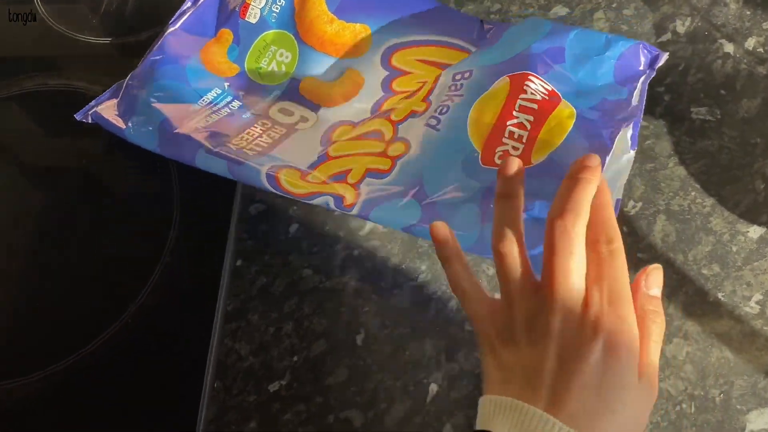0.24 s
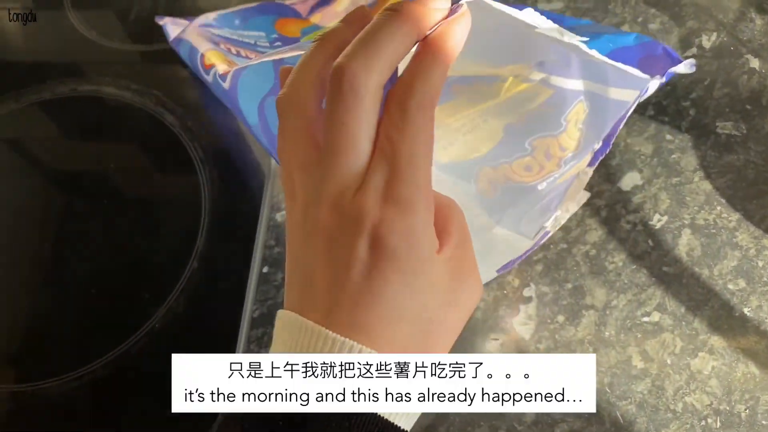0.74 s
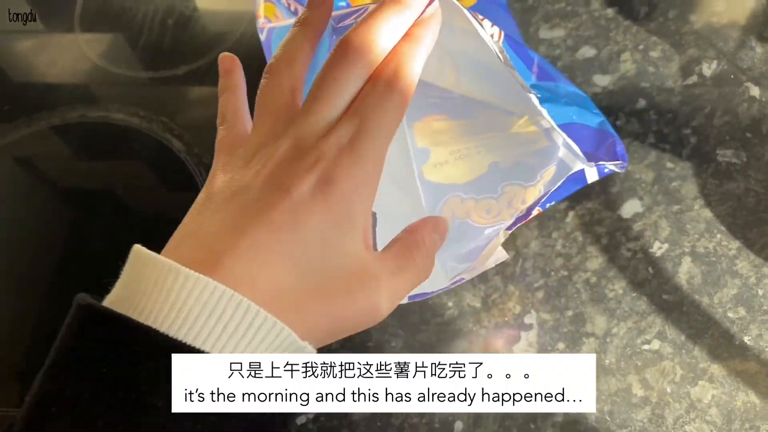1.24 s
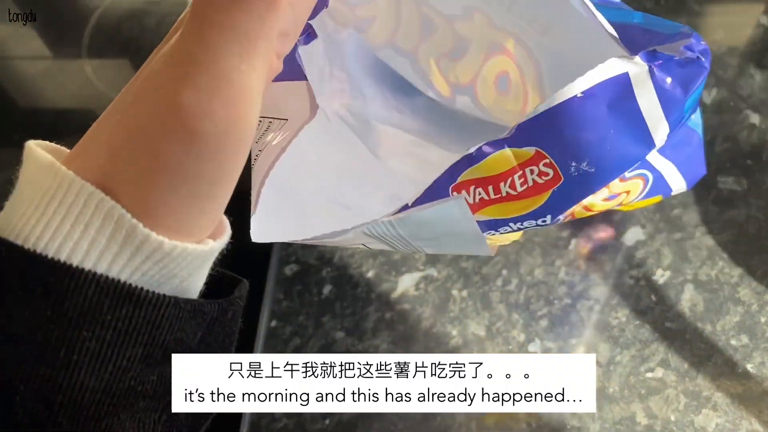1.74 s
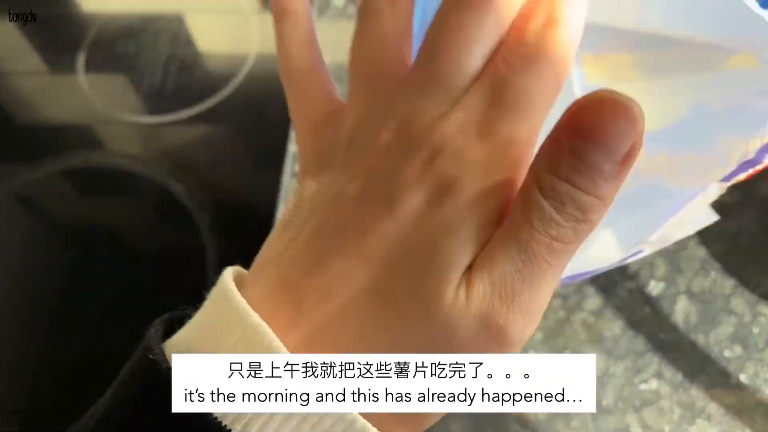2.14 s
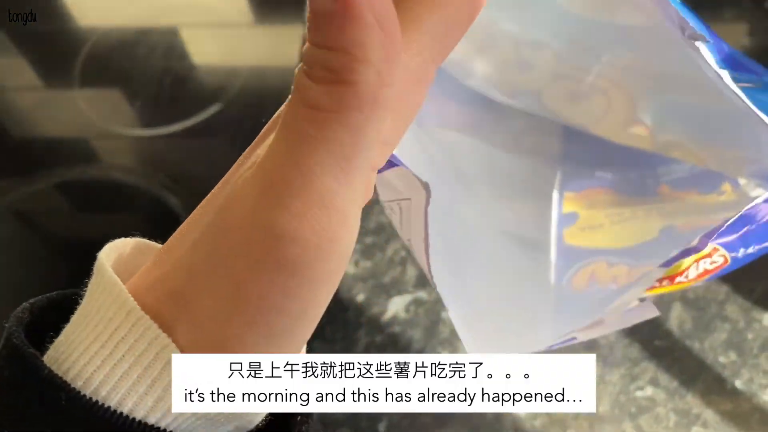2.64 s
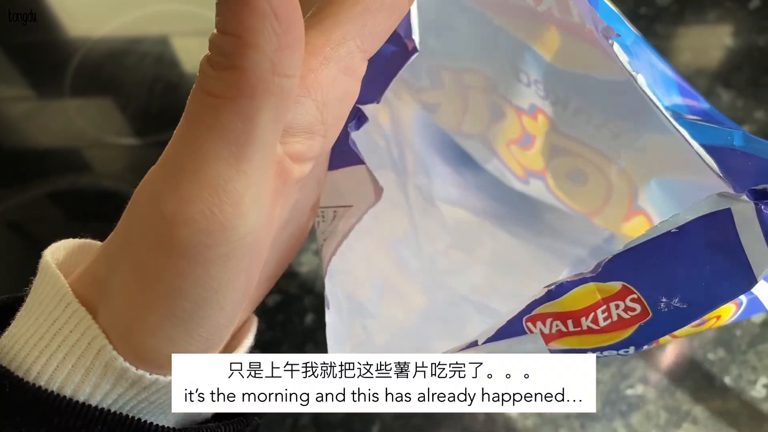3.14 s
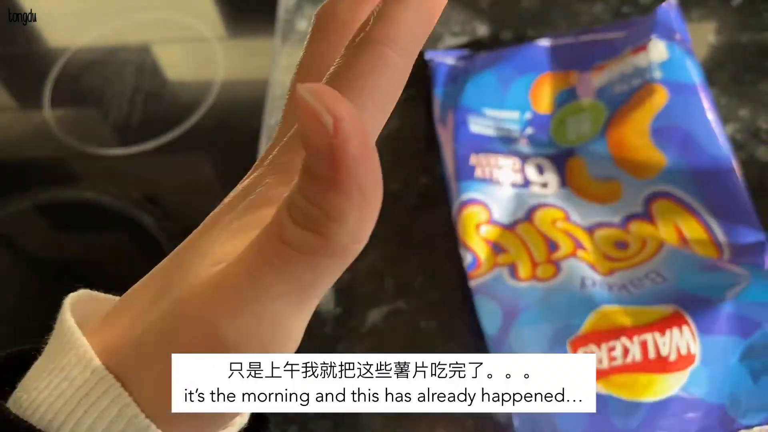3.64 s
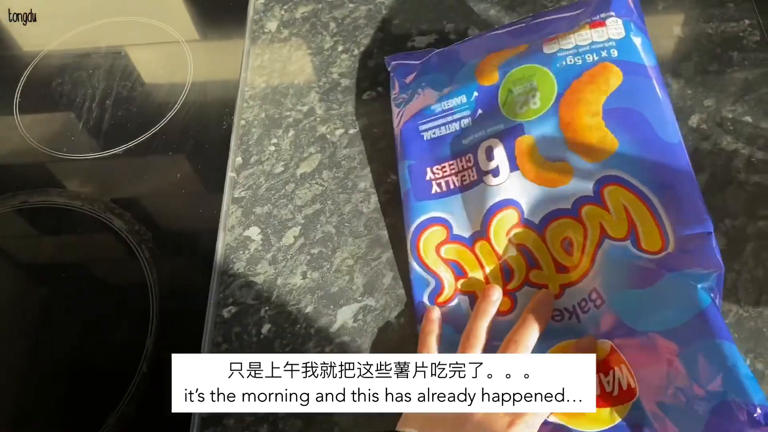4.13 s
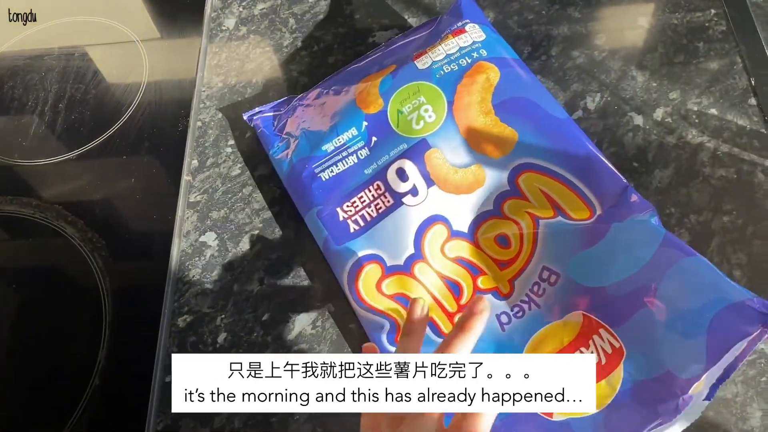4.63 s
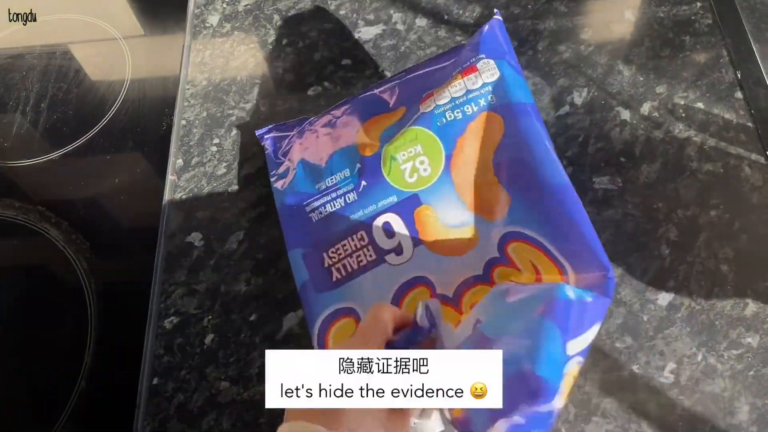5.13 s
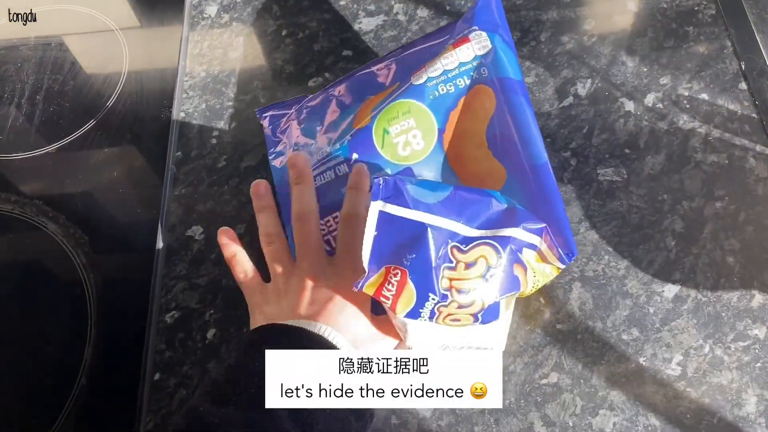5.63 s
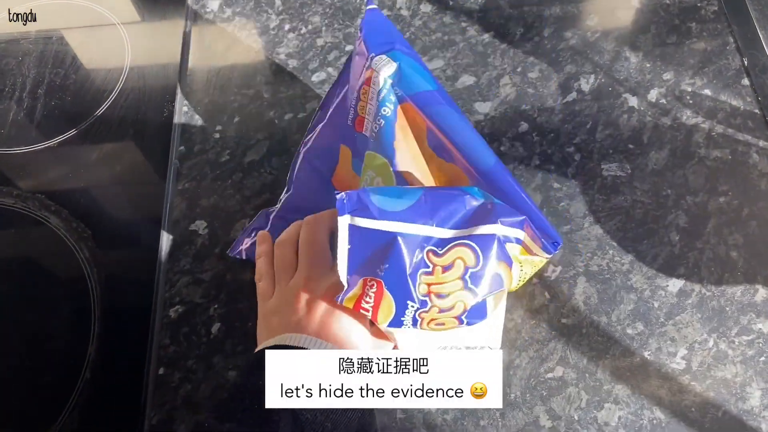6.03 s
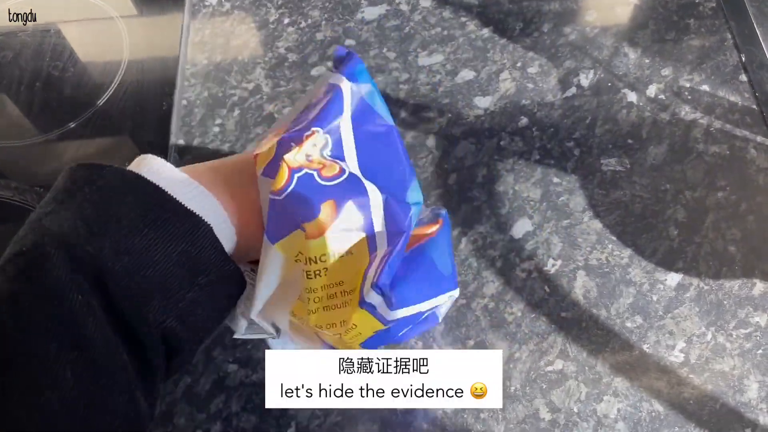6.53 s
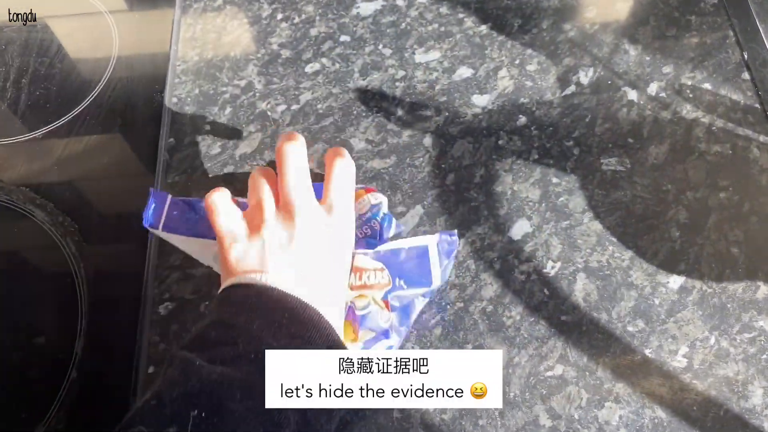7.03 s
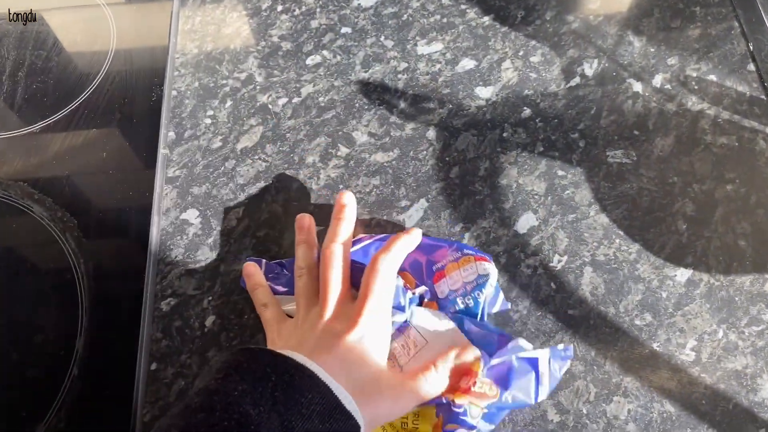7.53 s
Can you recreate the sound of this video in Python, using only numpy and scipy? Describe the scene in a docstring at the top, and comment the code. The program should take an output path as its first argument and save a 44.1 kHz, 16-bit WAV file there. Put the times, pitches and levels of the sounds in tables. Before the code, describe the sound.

An empty plastic snack bag is handled close to a handheld phone in a quiet kitchen. Light ticks and short rustles come first, with brief gaps and a few dull bumps of the gripped phone. Around four seconds sharp crackles arrive with soft hand thuds on the counter, then the bag is folded and crushed in loud, nearly continuous bright crinkling to the end.

```python
"""An empty plastic bag is turned, patted, folded and crushed by hand on a kitchen counter, near a phone.
The film rustles as swarms of tiny ringing creases; single creases snap as tick, ring and rattle.
Wide panels buckle with hollow decaying tones, pats ring the counter's modes, bumps ring the held phone.
Behind them lie low rumble from shaped noise, a faint fridge of wavering sines and quiet room air."""
import sys
import numpy as np
from scipy import signal
from scipy.fft import rfft, irfft, next_fast_len
from scipy.io import wavfile
from scipy.ndimage import uniform_filter1d

SR = 44100
rng = np.random.default_rng(int(sys.argv[2]) if len(sys.argv) > 2 else 0)


def voltage_ratio(level):
    """Linear amplitude factor for a level in decibels (scalar or array-like)."""
    return 10 ** (np.asarray(level, float) / 20)


def pcm_store(signal):
    """Save signal as 16-bit PCM."""
    levels = np.round(np.clip(np.atleast_2d(signal), -1, 1) * 32767)
    wavfile.write(sys.argv[1], SR, levels.astype(np.int16).T)


N = 342657


def read(points, hz):
    """A table over frequency, joined on a log axis."""
    f, value = np.transpose(points)
    return np.interp(np.log(hz + 1), np.log(f + 1), value)


def curve(rows, count):
    """One column of a table over time, at every sample."""
    rows = np.array(rows)
    return np.interp(np.arange(N) / SR, rows[:, 0], rows[:, count])


def evened(x):
    """Scaled to rms 1."""
    return x / np.sqrt(np.mean(x ** 2) + 1e-20)


def add(mix, s, sound):
    """Mixes a sound in at second s."""
    part = mix[..., round(s * SR):][..., :sound.shape[-1]]
    part += sound[..., :part.shape[-1]]


def coloured(x, points):
    """Shaped by a spectrum in dB."""
    hz = np.fft.rfftfreq(len(x), 1 / SR)
    return irfft(rfft(x) * voltage_ratio(read(points, hz)), len(x))


# steady handling of the film: (time [s], rustle level [dB], lift of thin small creases [dB])
HANDLING = [(0.0, -61, 4), (.11, -58, -10), (.22, -47, -1), (.39, -48.5, -10), (.56, -61, 4),
            (.78, -39, -1), (.84, -43, -9), (.99, -48, 3), (1.06, -57, 5), (1.55, -55, -7), (1.71, -75, -8),
            (1.95, -52, 2), (2.03, -46, 3), (2.23, -31, 6), (2.51, -52.5, -10), (2.6, -85, -8),
            (3.25, -75, 1), (3.4, -52, 0), (3.59, -58, -7), (3.8, -88, -2), (4.01, -93, -5),
            (4.22, -48, 2.5), (4.44, -52, 5), (4.68, -83, -6), (4.86, -53, 7), (4.95, -31, 3),
            (5.43, -31, 5), (5.52, -43, -3), (5.86, -41, 10.5), (5.9, -30.5, 2.5), (6.12, -31, 7),
            (6.42, -32, 5.5), (6.47, -38, -6), (6.55, -31.5, 3.5), (7.16, -33, 2), (7.44, -44.5, 13),
            (7.47, -31.5, 6.5), (7.77, -31.5, 10.5)]
# squeezes, pats and folds that set off a swarm: (peak time [s], level [dB], swell from 20 dB down [ms],
# fade to 20 dB down [ms], lift of thin small creases [dB])
SURGES = [(.06, -56.5, 61, 86, -2), (.417, -44, 10, 107, 6), (.61, -50.5, 25, 130, -12),
          (.69, -35, 28, 126, -4), (0.884, -31.5, 27, 28, -6), (1.19, -65, 38, 150, -8),
          (1.38, -54.5, 35, 147, -9), (1.61, -50, 20, 83, -14), (1.757, -43, 28, 67, -14),
          (1.97, -27.5, 13, 31, -8), (2.117, -28.5, 51, 58, 2), (2.178, -25.5, 45, 93, 3.5),
          (2.64, -59, 25, 110, -4), (2.749, -33.5, 13.5, 12, 4), (2.808, -34.5, 23, 20, -3),
          (2.985, -52, 46, 37, -25), (3.072, -43.5, 11, 100, -1), (3.295, -45, 12, 150, -6),
          (3.458, -28.5, 12.5, 45, 3.5), (3.651, -25.5, 23, 54, 0.5), (3.866, -50, 19, 20, -22),
          (4.04, -20.5, 13, 103, 4), (4.101, -19, 44, 38, 9), (4.14, -36, 30, 83, 2),
          (4.39, -47.5, 32, 68, 18), (4.524, -37.5, 51, 82, 4.5), (4.71, -17.5, 14, 36, 2),
          (4.814, -40, 38, 89, 12), (5.055, -24, 87, 58, 3.5), (5.17, -31, 39, 78, 6),
          (5.689, -18, 20, 34, 2.5), (5.76, -32.5, 30, 143, -1), (5.97, -28, 80, 151, 4.5),
          (6.251, -22.5, 130, 99, 4.5), (6.329, -22, 75, 99, 4), (6.65, -28.5, 67, 122, 4),
          (6.759, -25, 71, 27, 2), (6.82, -29.5, 26, 150, 9.5), (7.02, -31.5, 38, 130, 5),
          (7.27, -29, 134, 132, 7.5)]
SWELL_POWER, FADE_POWER = 2.0, 1.25  # power laws: 1 is a straight slope in dB, 2 a bell


def work():
    """Rustle level and thin-crease lift [dB]: steady handling plus swelling surges, added as power."""
    t = np.arange(0, N, 32) / SR
    peak, db, swell, fade, thin_db = np.transpose(SURGES)[:, :, None]
    late_ms = (t - peak) * 1000
    rise = abs(late_ms / swell) ** SWELL_POWER
    fall = abs(late_ms / fade) ** FADE_POWER
    surge_db = db - 20 * np.where(late_ms < 0, rise, fall)
    steady_db = curve(HANDLING, count=1)[::32]
    power = np.vstack([voltage_ratio(2 * np.maximum(surge_db, -200)), voltage_ratio(2 * steady_db)])
    thin = np.vstack([thin_db + 0 * t, curve(HANDLING, count=2)[::32]])
    total = power.sum(0)
    rows = 10 * np.log10(total), (power * thin).sum(0) / total  # the louder motion sets the lift
    return [np.interp(np.arange(N) / SR, t, row) for row in rows]


# relative colour of the swarm: (frequency [Hz], level per Hz [dB])
FILM = [(200, -7), (330, 3), (800, -0.5), (2000, 3), (4000, 4), (6500, 0.5), (9000, -4.5), (12000, -9),
        (16000, -6)]
# wide slack panels stand out more, the gentler the handling: lift per dB, rustle level of no lift [dB]
SLACK_PER_DB, SLACK_LEVEL_DB = -0.1335, -41.5


def swarm(clumps, per_s=200, spread_db=3.3, cycles=1.8, hiss_db=-10, clump_db=2.2, patchy_db=2.4):
    """Tiny creases flip at random; each size of crease rings a few cycles at its own pitch."""
    t, out = np.arange(512) / SR, np.zeros(N)
    effort_db, thin_db = work()
    slack_db = SLACK_PER_DB * (np.maximum(effort_db, -70) - SLACK_LEVEL_DB)
    for hz in np.geomspace(300, 15000, 20):
        flips = rng.random(N) < per_s / SR
        size = voltage_ratio(spread_db * np.minimum(rng.exponential(1, N), 5)) * flips
        drive = evened(size * rng.choice([-1, 1], N)) + voltage_ratio(hiss_db) * rng.standard_normal(N)
        ring = np.exp(-t * hz / cycles) * np.sin(2 * np.pi * hz * t)
        band = evened(signal.oaconvolve(drive, ring)[:N])
        lift_db = thin_db if hz > 7000 else slack_db if hz < 1000 else 0
        patch = evened(uniform_filter1d(rng.standard_normal(N), 2500))  # each size comes in its own bursts
        gain = voltage_ratio(read(FILM, hz) + lift_db + patchy_db * patch)
        out += gain * np.sqrt(hz) * band  # log-spaced bands widen with pitch
    return voltage_ratio(effort_db + clump_db * clumps) * evened(out)


# single creases that snap: (time [s], level [dB], ring [Hz], relative tick [dB], relative rattle [dB])
SNAPS = [(0.0456, -39, 1780, -14, -21), (0.0503, -23, 1760, -13, -8.5), (0.089, -28, 1830, 1, -11),
         (.1129, -33, 1160, -3.5, -1.5), (0.161, -35.5, 1270, -7, -6), (0.201, -31.5, 2840, -14, -10),
         (0.2373, -29, 2290, -21, -5), (0.2551, -19, 2860, -14, -13), (0.2846, -31.5, 2090, -15, -4),
         (.309, -26.5, 2140, -6.5, -7), (0.3467, -24, 4700, -20, -15), (.364, -27.5, 1950, -24, -13),
         (.414, -18, 5200, -8.5, -14), (.4868, -37, 2720, -26, -15), (.595, -33, 2300, -26, -11),
         (.609, -33.5, 3660, -1, -23), (.6716, -36, 1190, -17, -6), (.688, -29.5, 1900, -3, -2.5),
         (0.7377, -22, 2620, -1, -10.5), (0.8138, -20, 2070, -30, -19), (.854, -33, 1910, -17, -10),
         (0.8739, -27.5, 2720, 1, -8), (.931, -32, 4880, -13.5, -14), (0.9435, -26, 2340, -13, -9),
         (0.9976, -23, 2130, -11, -9), (1.041, -36, 3330, -7, -13), (1.093, -37.5, 1380, -3, -3),
         (1.1367, -34, 3070, -18, -12), (1.1766, -27, 2260, -7.5, -7.5), (1.2313, -43, 1270, -15, -10),
         (1.3717, -37.5, 1090, 3.5, -11.5), (1.425, -38.5, 1180, -16, -16), (1.596, -39, 4500, -13, -11),
         (1.6161, -37, 4060, -7, -8.5), (1.7499, -31, 4570, 5, -15), (1.7603, -20.5, 4100, -8.5, -10),
         (1.8878, -35.5, 1840, -27, -6), (1.932, -40, 1160, -9, -14), (1.9656, -10.5, 5060, -11, -22),
         (1.9879, -19.5, 1670, -5.5, -7.5), (2.0587, -35, 1880, -18, -6), (2.0724, -16.5, 5900, -22, -14),
         (2.1003, -31, 1940, 6, -8), (2.147, -22, 2650, -4, -14), (2.1691, -18.5, 1930, -12, -0.5),
         (2.299, -21, 2940, -10, -9), (2.393, -39, 4560, 7, -14), (2.418, -28, 3040, -7.5, -5),
         (2.468, -36.5, 1080, -11, -5.5), (2.484, -39.5, 2040, -12, 1.5), (2.6288, -36, 2040, -26, -8),
         (2.6344, -32, 1250, -14, -10), (2.691, -44.5, 2280, -31, -0.5), (2.7438, -26.5, 5600, 5.5, -16),
         (2.788, -32, 2300, 5, -21), (2.804, -26, 2820, -3.5, -15), (2.943, -44, 1260, -32, -5),
         (2.9793, -34.5, 2760, -15, -8), (3.0025, -29, 950, -35, -30), (3.0642, -34.5, 3720, -34, -2.5),
         (3.151, -34.5, 910, -31, -10.5), (3.1855, -25, 6140, -4.5, -21), (3.2657, -36, 924, -26, -16),
         (3.2896, -31, 2080, -5.5, -7), (3.3375, -35, 1220, -17, -8), (3.3678, -34, 810, -19, -4.5),
         (3.4316, -28.5, 2260, -16, -13), (3.4536, -24, 2620, -13, -10), (3.5344, -37, 2240, -17, -6),
         (3.62, -35, 3380, -26, -6), (3.64, -8.5, 4700, -13, -26), (3.8532, -38, 2490, -32, -15),
         (4.0212, -25.5, 3350, -16, -2), (4.027, -17, 2290, -9.5, -2.5), (4.0488, -18, 1740, -18, -1.5),
         (4.0694, -7.5, 2930, -10.5, -3.5), (4.1049, -21, 1030, -13, -7), (4.267, -30, 6000, -13, -17),
         (4.3258, -39, 1940, -9, -7), (4.3816, -28.5, 3170, -4.5, -11), (4.4158, -30, 2700, -9, -12),
         (4.4653, -21, 3380, -17, -12.5), (4.488, -22, 4070, -13, -15), (4.5228, -21, 3600, -27, -8),
         (4.5534, -24.5, 2860, -20, -9.5), (4.6156, -35.5, 2870, -24, -4), (4.627, -45, 1800, -6, -3),
         (4.698, -8.5, 3020, -14, -7.5), (4.807, -16, 4400, -19, -6), (4.87, -36, 2610, -12, -5),
         (4.8992, -30, 1830, -21, -1), (4.9422, -26, 1740, -9, -6), (4.959, -15, 2920, -14, -8),
         (4.9896, -20, 2700, -8, -6.5), (5.042, -12, 2940, -18, -6), (5.1295, -15, 1940, -22, -13),
         (5.1627, -21, 2400, -5.5, -1.5), (5.234, -22.5, 2530, -14, -4), (5.2922, -19.5, 1710, -0.5, -12.5),
         (5.335, -18.5, 6860, -14, -8.5), (5.39, -29.5, 2600, 0, -3), (5.435, -21, 5250, -15, -7),
         (5.5366, -25, 4610, -7, -11), (5.5792, -25.5, 1380, -27, -14), (5.6317, -35.5, 1310, -0.5, -2.5),
         (5.6838, -25, 2170, -24, -2), (5.7623, -27, 1030, -14, -1), (5.78, -23, 6760, 1, -17),
         (5.8102, -24, 2470, -8, -11), (5.871, -27, 4160, 0, -10), (5.88, -13, 4910, -15, -13.5),
         (5.9055, -20.5, 1900, -2, -5), (5.946, -15.5, 4930, -18, -14), (5.975, -12.5, 5000, -8, -11),
         (6.011, -8.5, 6640, -2.5, -17.5), (6.0715, -11, 3870, -9, -9), (6.1, -13.5, 5230, -5.5, -11),
         (6.127, -10, 6800, -16, -11), (6.1696, -14, 2400, -5, -8), (6.2575, -22, 2140, -8, -3),
         (6.3002, -10, 6200, -4.5, -11), (6.3301, -13, 2300, -10, -9), (6.3862, -20, 4270, -10, -8),
         (6.4188, -14.5, 5540, -13, -12), (6.4397, -18.5, 2060, -8, -14), (6.5114, -22, 4500, -18, -12),
         (6.5219, -25.5, 1910, -4, -7), (6.559, -15.5, 5300, -4, -14), (6.6013, -20, 1180, -9, -9),
         (6.6159, -15.5, 2160, -0.5, -9), (6.6525, -13.5, 1750, -9, -7), (6.6917, -11.5, 1850, 3.5, -25.5),
         (6.7501, -21, 2150, 2.5, -11), (6.8139, -26, 1500, -3, -7), (6.9905, -27, 4610, -37.5, -25.5),
         (7.0114, -23, 2120, -8, -11), (7.062, -19, 5030, -23, -8), (7.143, -35, 1890, 7, -3),
         (7.265, -22, 2200, -4, -5.5), (7.3331, -26.5, 3400, -2, -1.5), (7.3775, -27, 1230, -17, 1),
         (7.4093, -15.5, 6260, -8.5, -12), (7.434, -25, 5200, -15, -7), (7.4679, -20.5, 2330, -4.5, -5),
         (7.5575, -26, 1130, 1, -15), (7.604, -15.5, 5200, -6, -8.5), (7.6546, -17, 2800, -4, -8.5),
         (7.7366, -23, 1780, -14, -0.5)]
SNAP_PAN_DB = 1.5  # creases lie scattered left and right: spread of the level difference


def snaps(cycles=2.0, rattle_s=.008, tick_s=.0008):
    """A sharp tick, a short ring of the panel that let go, and a rattle as the film settles."""
    t, out = np.arange(1500) / SR, np.zeros((2, N))
    for s, db, hz, tick_db, rattle_db in SNAPS:
        tick_noise, rattle_noise = rng.standard_normal((2, len(t)))
        pan = voltage_ratio(np.array([[.5], [-.5]]) * SNAP_PAN_DB * rng.standard_normal())
        turn = 2 * np.pi * hz * t
        ring = np.exp(-t * hz / cycles) * (np.sin(turn) + 0.31 * np.sin(1.75 * turn))  # and its next mode
        bright = signal.lfilter([1, -.5], 1, tick_noise)
        tick_shape = np.exp(-t / tick_s) + voltage_ratio(rattle_db + 4.0) * np.exp(-t / rattle_s)
        tick = voltage_ratio(tick_db + 3) * bright * tick_shape
        # a broad resonance around the ring pitch
        wide = signal.lfilter([1, 0, -1], [1, -1.7 * np.cos(2 * np.pi * hz / SR), .74], rattle_noise)
        rattle = voltage_ratio(rattle_db) * evened(wide) * np.exp(-t / rattle_s)
        add(out, s + .0006, voltage_ratio(db) * (tick + pan * (ring + rattle)))
    return out


# wide panels of the bag that buckle with a hollow pop: (time [s], level [dB], pitch [Hz])
POPS = [(0.113, -55, 590), (0.202, -44, 541), (0.346, -40, 596), (0.414, -40, 533), (0.461, -41, 600),
        (0.738, -49, 350), (0.943, -47.5, 334), (0.991, -41, 520), (1.605, -45, 355), (1.748, -54, 634),
        (1.97, -29.5, 357), (2.168, -29, 347), (2.416, -41, 590), (2.631, -39.5, 353), (2.746, -59, 355),
        (2.81, -41, 347), (3.008, -37, 606), (3.268, -38, 507), (3.456, -30.5, 332), (3.644, -26.5, 657),
        (4.027, -24.5, 518), (4.465, -48, 443), (4.704, -43, 232), (4.904, -44, 348), (5.217, -26.5, 362),
        (5.286, -36, 350), (5.603, -42, 330), (5.678, -33, 397), (5.876, -26.5, 335), (6.012, -32, 452),
        (6.08, -25.5, 517), (6.151, -26, 340), (6.225, -24.5, 327), (6.524, -27, 350), (6.614, -24.5, 326),
        (6.654, -22.5, 340), (6.715, -28.5, 325), (7.461, -40, 570), (7.562, -46, 664), (7.661, -40, 650)]


def pops(cycles=3.03):
    """The air held in the bag swings a few times when a panel buckles."""
    t, out = np.arange(3000) / SR, np.zeros(N)
    for s, db, hz in POPS:
        swing = t * hz * np.exp(-t * hz / cycles * 2)
        add(out, s, voltage_ratio(db + 2.5) * swing * np.sin(2 * np.pi * hz * t))
    return out


# decay of the room echoes: (frequency [Hz], t60 [s])
ROOM = [(250, 0.43), (1000, 0.12), (4000, 0.22), (14000, 0.12)]


def room(x, count=3):
    """Sparse taps of random sign, each band dying at its own speed; the echoes change as the bag moves."""
    taps = np.zeros((count, SR // 2))
    at = np.arange(200, SR // 2 - 20, 20) + rng.integers(0, 20, (count, (SR // 2 - 201) // 20))
    np.put_along_axis(taps, at, rng.choice([-1., 1.], at.shape), 1)
    hz, t, z = signal.stft(taps, SR, nperseg=256)
    tails = signal.istft(z * voltage_ratio(-60 * t / read(ROOM, hz)[:, None]), SR, nperseg=256)[1]
    # the sound drifts between the sets of echoes
    phase = np.arange(N) / 9000 + np.arange(count)[:, None] / count
    turn = np.sin(np.pi * phase) * np.sqrt(2 / count)
    return signal.fftconvolve(x * turn, tails / np.linalg.norm(tails[0]), axes=1)[:, :N].sum(0)


# hand on the counter: (time [s], level [dB])
PATS = [(4.081, -25), (4.7, -29.5), (5.689, -44), (6.597, -40)]
# ringing modes of the counter: (frequency [Hz], level [dB], t60 [s])
COUNTER = [(123, -3.5, 0.3), (210, 2.5, 0.2), (323, -2, 0.16), (365, -7, 0.057), (452, -31, 0.047)]


def pats():
    """Soft blows of the hand ring the modes of the counter."""
    t, out = np.arange(SR // 2) / SR, np.zeros(N)
    ring = sum(voltage_ratio(db - 60 * t / t60) * np.sin(2 * np.pi * hz * t) for hz, db, t60 in COUNTER)
    soft_onset = 1 - np.exp(-(t / 0.015) ** 2)
    for s, db in PATS:
        add(out, s, voltage_ratio(db + 4.5) * ring * soft_onset)
    return out


# dull bumps through the hand that holds the phone:
# (time [s], level [dB], hardness as level of scuff and upper modes [dB])
BUMPS = [(2.17, -43, -29), (3.003, -32, -2), (3.269, -38, -4.5), (3.409, -41, -9), (3.498, -47, -12),
         (7.741, -41.5, -10)]
# ringing modes of the gripped phone: (frequency [Hz], level [dB], t60 [s])
GRIP = [(50.6, -12.5, 0.93), (92.4, 9.5, 0.13), (150.7, -11.5, 0.63), (338, -20.5, 0.7), (544, -13, 0.11),
        (646, -17, 0.19), (950, -16, 0.26), (1180, -19, 0.2), (1380, -20, 0.089), (1750, -23, 0.25),
        (2150, -25, 0.18)]


def bumps():
    """Each bump rings the gripped phone under a dull scuff; harder ones bring up the higher modes."""
    t, out = np.arange(SR // 2) / SR, np.zeros(N)
    for s, db, hard_db in BUMPS:
        modes = np.zeros(len(t))
        for hz, mode_db, t60 in GRIP:
            level = voltage_ratio(mode_db + hard_db * (hz > 120) - 60 * t / t60)
            onset = 1 - np.exp(-(t * hz / 2.2) ** 2)  # low modes take longer to swing up
            modes += level * np.sin(2 * np.pi * hz * t) * onset
        dull = signal.lfilter([.1], [1, -1.6, .7], rng.standard_normal(len(t)))
        scuff = dull * np.exp(-t / 0.043)
        add(out, s, voltage_ratio(db + hard_db - 7.5) * scuff)
        add(out, s, voltage_ratio(db + 10) * modes)
    return out


# relative colour of the rumble: (frequency [Hz], level per Hz [dB])
LOW = [(12, -40), (30, -4), (55, 8.5), (145, 3.5), (204, -1.5), (253, -11), (300, -3), (390, -5),
       (660, -120)]
# the grip on the phone shifts: (time [s], level [dB])
SHIFTING = [(0.0, -64.5), (.85, -59), (1.7, -60.5), (1.88, -54.5), (2.21, -42.5), (2.45, -57.5),
            (2.95, -62.5), (3.45, -53.5), (3.95, -62.5), (4.6, -60), (5.0, -51), (5.4, -59), (6.0, -53.5),
            (6.35, -48), (6.49, -57), (6.55, -40.5), (7.0, -65), (7.3, -53.5), (7.68, -67), (7.77, -55)]
PUSH_DB, PUSH_S = -26, 0.033  # low air pushed by the worked bag: relative to the rustle, averaging time
SHAKE_DB, SHAKE_RISE_S, SHAKE_T60_S = -1, 0.028, 0.48  # the hand shakes after each bump


def rumble():
    """Low noise, partly shared by the ports, follows the shifting grip, pushed air and shaking hand."""
    common, left, right = (evened(coloured(v, LOW)) for v in rng.standard_normal((3, N)))
    t = np.arange(N) / SR
    effort_db = work()[0]
    push = uniform_filter1d(voltage_ratio(2 * (effort_db + PUSH_DB)), int(PUSH_S * SR))
    power = voltage_ratio(2 * curve(SHIFTING, count=1)) + push
    for s, db, _ in BUMPS:
        late = np.maximum(t - s, 0)
        rise = np.minimum(late / SHAKE_RISE_S, 1) ** 2
        power = power + voltage_ratio(2 * (db + SHAKE_DB - 60 * late / SHAKE_T60_S)) * rise
    return np.sqrt(abs(power)) * (common + voltage_ratio(-6) * np.array([left, right]))


# fridge tones before the swell: (frequency [Hz], level [dB])
HUM = [(369, -76), (588, -71), (791, -84)]
# the hum wavers: (time [s], gain [dB])
HUM_SWELL = [(0.0, -22), (.3, -11), (.5, 9.5), (.95, 8), (1.2, -2), (2.8, -23.5), (3.7, 10), (4.0, -4),
             (4.6, -15.5), (7.77, -7.5)]


def fridge():
    """Steady sines share one wavering level, nearer the left port."""
    t = np.arange(N) / SR
    hum = sum(voltage_ratio(db) * np.sin(2 * np.pi * (hz * t + rng.random())) for hz, db in HUM)
    return hum * voltage_ratio(curve(HUM_SWELL, count=1) + np.array([[6], [-6]]))


# relative colour of the quiet room: (frequency [Hz], level per Hz [dB])
AIR = [(100, -14), (200, 2), (700, 0), (2800, -5), (8000, -15), (15000, -22)]
AIR_DB = -61.5  # rms, before the ports


def room_air():
    """Steady noise shaped to the soft, treble-poor colour of a quiet room."""
    return voltage_ratio(AIR_DB) * evened(coloured(rng.standard_normal(N), AIR))


def bag(clumps):
    """The film's swarm, snaps and pops on two channels, with room echoes and room air."""
    low_cut = signal.butter(2, 230, "high", fs=SR, output="sos")  # the film's sounds carry nothing below about 230 Hz
    film = signal.sosfilt(low_cut, swarm(clumps) + snaps() + pops())
    return film + voltage_ratio(-7.5) * room(film.mean(0)) + room_air()


# likeness of the two microphone ports: (frequency [Hz], likeness 0 to 1)
SAME = [(100, 1), (350, 0.86), (600, 0.6), (1900, 0.59), (3600, 0.19), (5700, 0.11), (6600, 0.48),
        (7500, .999)]
# phase by which the right port leads, before the lag below: (frequency [Hz], lead [rad])
LEAD = [(1900, 0.19), (3200, -2.14), (4400, -4), (5500, 2), (6200, -0.88)]
# level difference of the ports: (frequency [Hz], left minus right [dB])
BALANCE = [(100, -5), (600, 2.5), (2000, 1), (5000, 1.4), (7000, 0.4)]
SPLIT_HZ, LAG_S = 6437, 0.00024  # above this the left port lags by a fixed time


def ports(x, aside):
    """The right port hears the sound shifted in phase, mixed with creases that face it more than the left."""
    size = next_fast_len(N + 2048)
    hz = np.fft.rfftfreq(size, 1 / SR)
    same = np.clip(read(SAME, hz), 0, 1)
    lead = read(LEAD, hz) + 2 * np.pi * LAG_S * np.maximum(hz - SPLIT_HZ, 0)
    right = same * rfft(x[1], size) + 1j * np.sqrt(1 - same ** 2) * rfft(aside[1], size)
    right = right * voltage_ratio(-read(BALANCE, hz)) * np.exp(1j * lead)
    return np.array([x[0], irfft(right, size)[:N]])


def scene():
    """The bag at both ports, the blows and the kitchen."""
    clumps = evened(uniform_filter1d(rng.standard_normal(N), 300))  # neighbouring creases set each other off
    film = ports(bag(clumps), bag(clumps))
    return film + pats() + bumps() + rumble() + fridge()


def band_limit(x):
    """A steep low-pass at the top of the band."""
    return signal.sosfilt(signal.butter(12, 17000, fs=SR, output="sos"), x)


def record(dry):
    """Soft overload rounds off the sharpest snaps, then a steep filter limits the band to 15.9 kHz."""
    edge = signal.firwin(255, 15900, window=("kaiser", 6), fs=SR)
    mix = signal.oaconvolve(np.tanh(dry), edge[None], "same")
    return band_limit(mix)


dry = scene()
out = record(dry)
pcm_store(out)
```